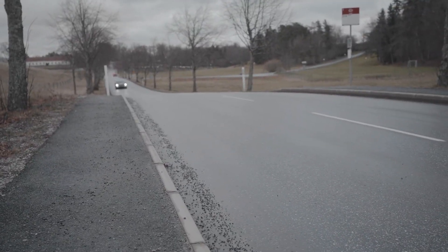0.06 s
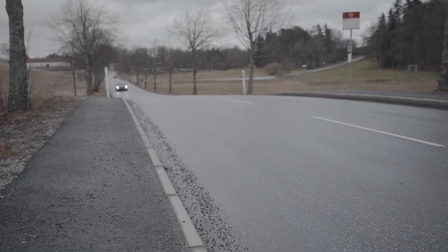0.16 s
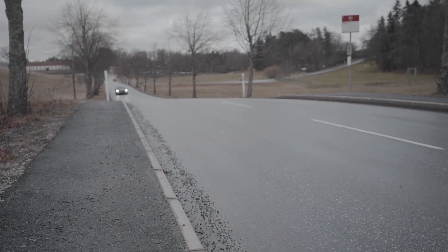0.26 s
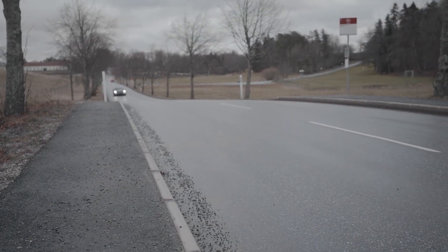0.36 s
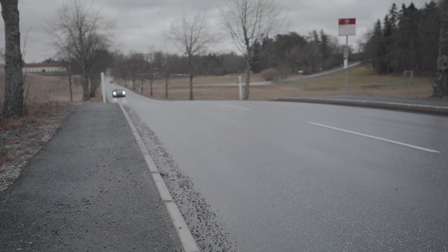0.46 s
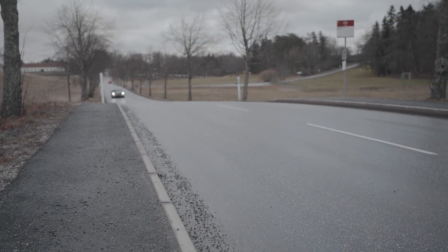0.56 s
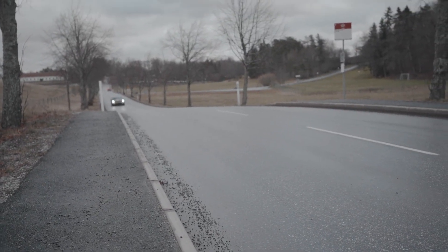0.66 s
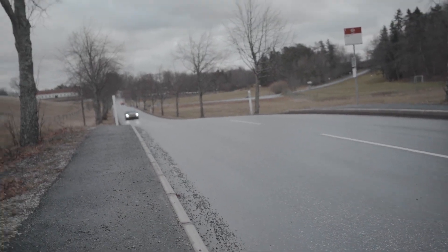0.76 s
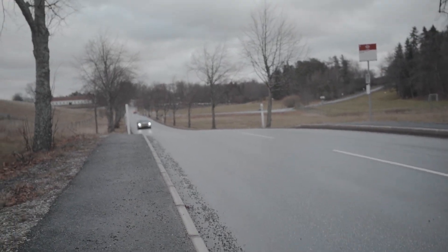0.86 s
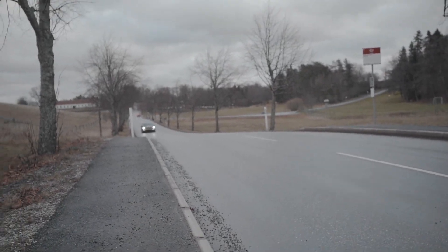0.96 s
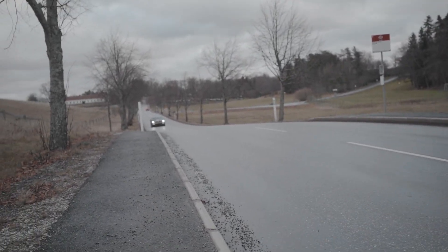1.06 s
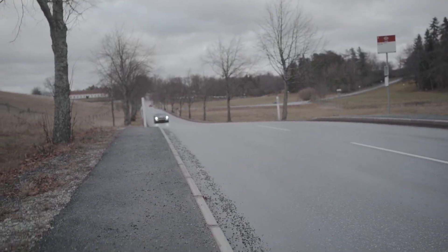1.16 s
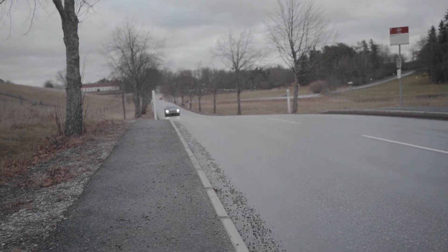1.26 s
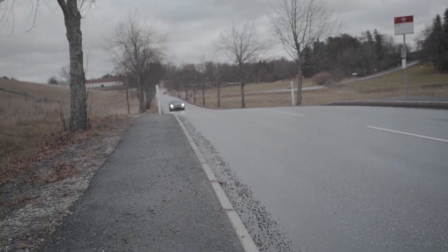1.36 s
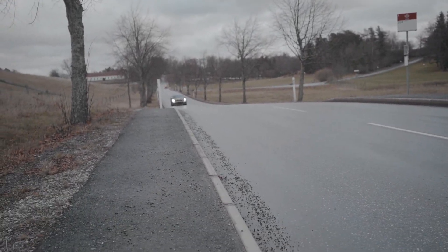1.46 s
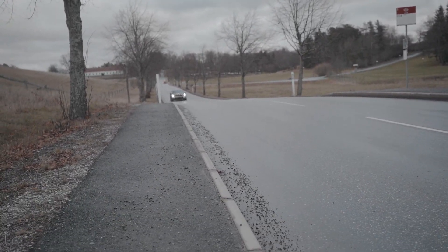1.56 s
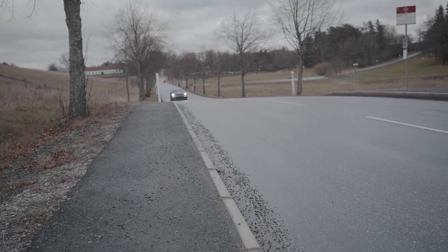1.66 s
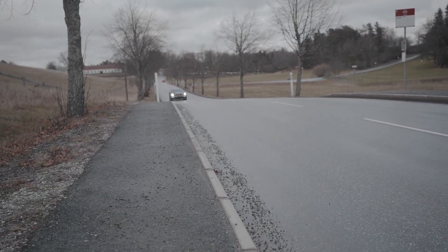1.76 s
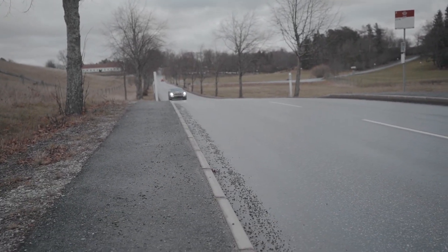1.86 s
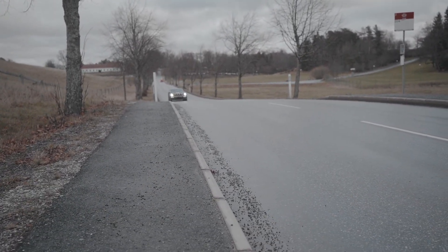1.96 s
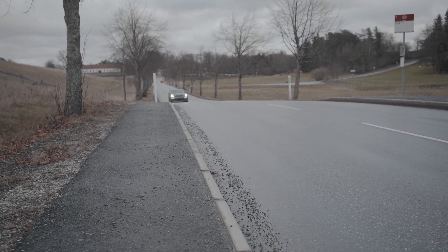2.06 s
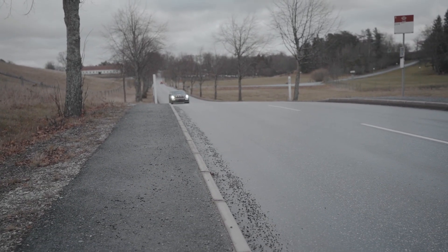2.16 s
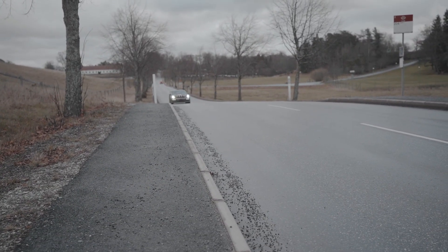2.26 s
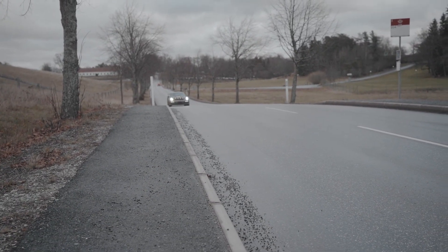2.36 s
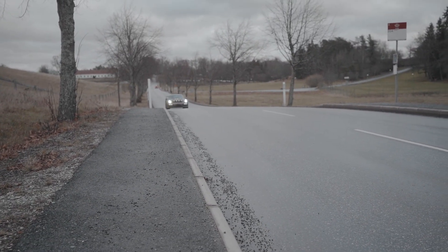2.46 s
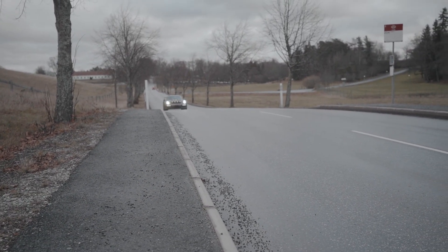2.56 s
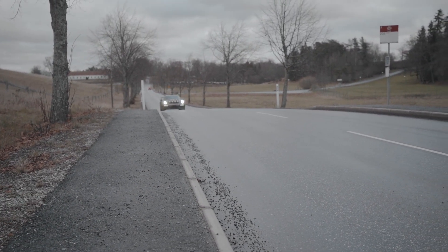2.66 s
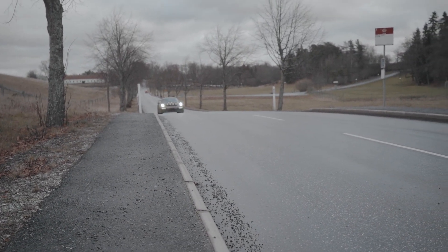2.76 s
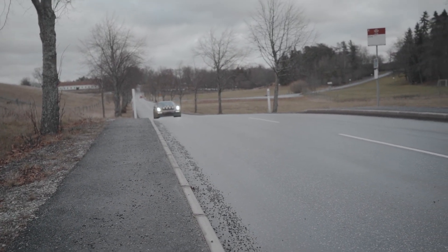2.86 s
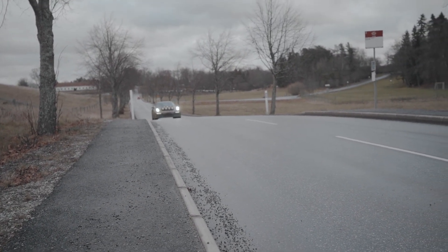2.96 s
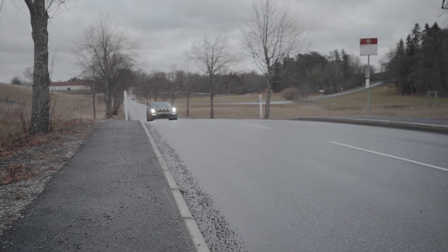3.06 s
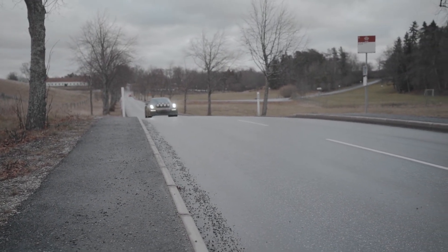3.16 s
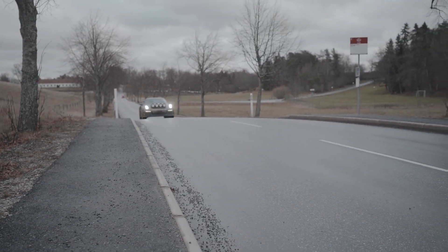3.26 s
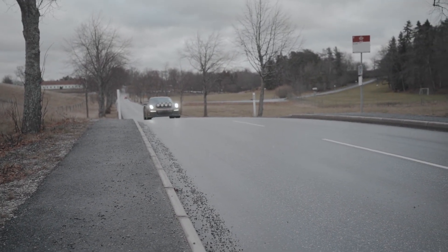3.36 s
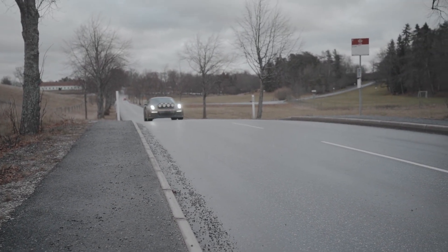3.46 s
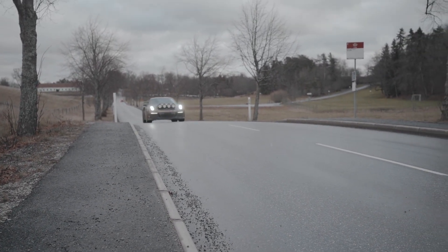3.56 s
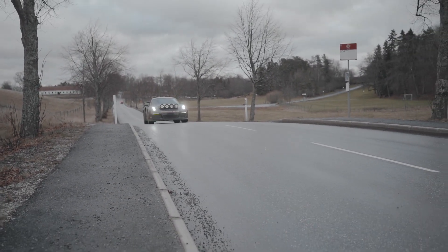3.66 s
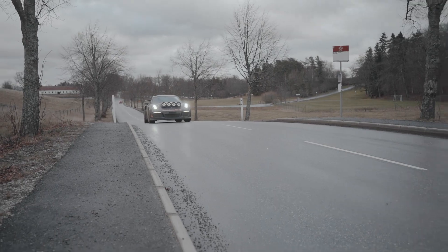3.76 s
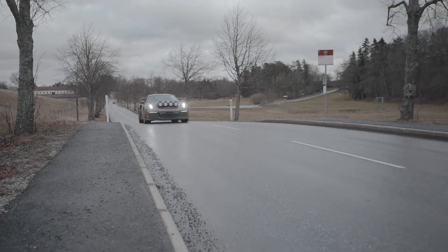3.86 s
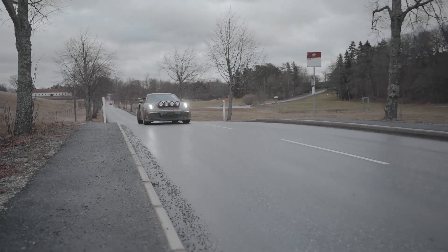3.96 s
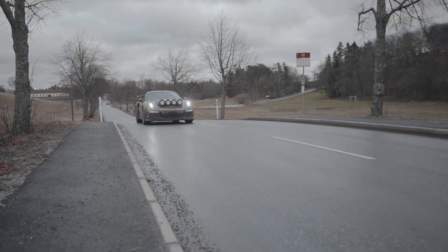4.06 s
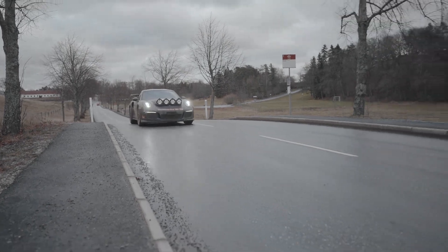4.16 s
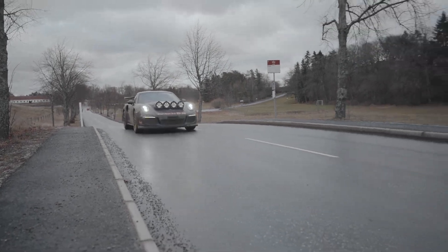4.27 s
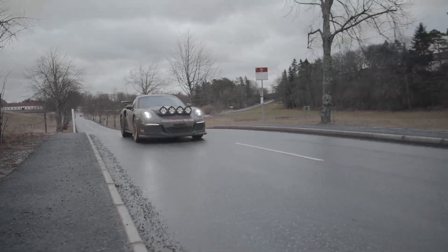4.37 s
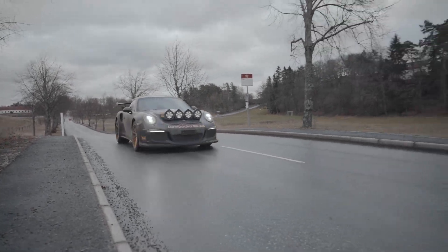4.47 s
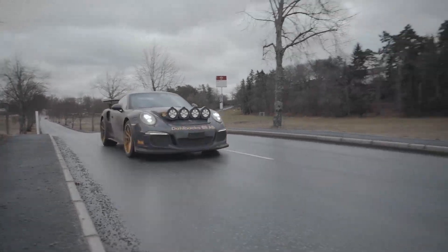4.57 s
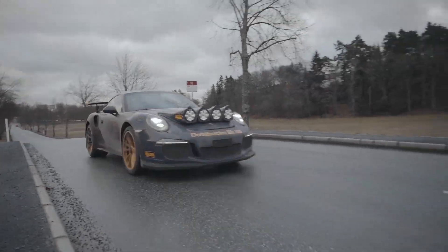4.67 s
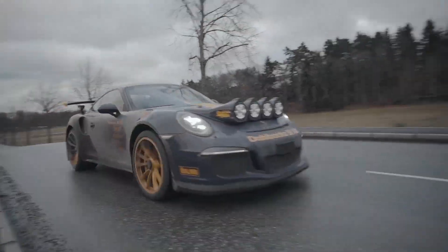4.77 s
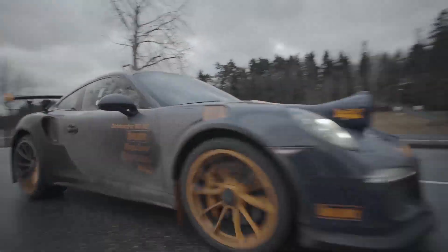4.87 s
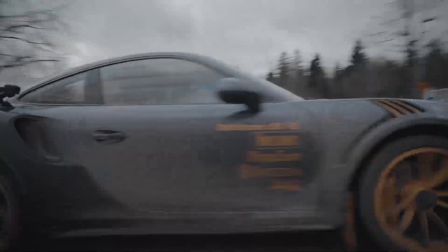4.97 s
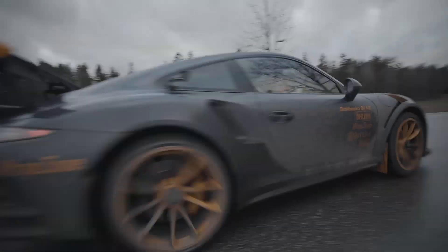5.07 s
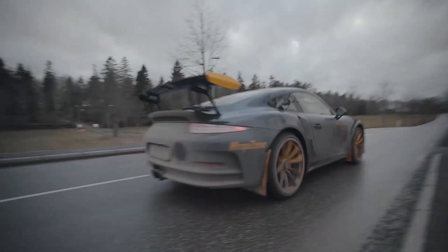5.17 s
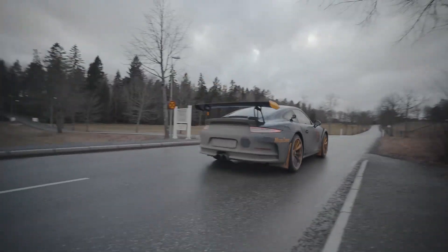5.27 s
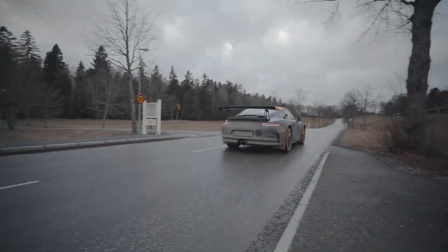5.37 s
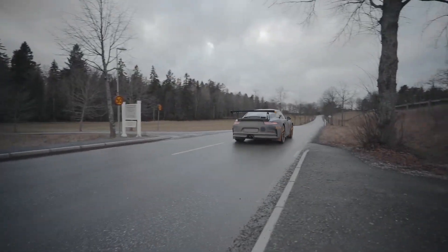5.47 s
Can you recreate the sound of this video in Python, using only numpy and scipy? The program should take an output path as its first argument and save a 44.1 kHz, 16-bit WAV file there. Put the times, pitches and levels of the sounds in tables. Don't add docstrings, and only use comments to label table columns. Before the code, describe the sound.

Gusty wind and a distant engine drone swell into a full-throttle six-cylinder howl, with a crackling gear change and a loud, clipped pass-by.

```python
import sys
import numpy as np
from scipy import signal
from scipy.fft import rfft, irfft
from scipy.io import wavfile
from scipy.ndimage import uniform_filter1d

SR = 44100
rng = np.random.default_rng(int(sys.argv[2]) if len(sys.argv) > 2 else 0)


def transcribe(u):
    v = np.clip(np.atleast_2d(u).T, -1, 1)
    q = np.round(v * 32767).astype(np.int16)
    wavfile.write(sys.argv[1], SR, q)


def linear_from_db(decibels):
    return 10 ** (np.asarray(decibels, float) / 20)


N = 243431
THROTTLE_S = 3.91


def rms_one(x):
    return x / np.sqrt(np.mean(x ** 2) + 1e-20)


def in_time(rows):
    s, *columns = np.transpose(rows)
    return [np.interp(np.arange(N) / SR, s, column) for column in columns]


def step(s, rise_s):
    return 0.5 + 0.5 * np.tanh((np.arange(N) / SR - s) / rise_s)


def bump(s, half_s):
    return np.exp(-0.5 * ((np.arange(N) / SR - s) / half_s) ** 2)


def drift(rate):
    pole = np.exp(-80 * np.pi * rate / SR)
    white = rng.standard_normal(N // 40 + 2002)
    slow = signal.lfilter([1], [1, -2 * pole, pole * pole], white)[2000:]
    return np.interp(np.arange(N) / 40, np.arange(len(slow)), rms_one(slow))


def coloured(spectrum):
    hz, level_db = np.transpose(spectrum)
    bins = np.fft.rfftfreq(N, 1 / SR) + 1e-3
    shape = linear_from_db(np.interp(np.log(bins), np.log(hz), level_db, left=-90, right=-90))
    return rms_one(irfft(rfft(rng.standard_normal(N)) * shape, N))


def band(x, low_hz, high_hz):
    return signal.sosfilt(signal.butter(2, [low_hz, high_hz], "band", fs=SR, output="sos"), x)


def lines(turn, orders, levels_db, wobble_db, rate=5):
    out = 0
    for order, db in zip(orders, levels_db):
        height = np.sqrt(2) * linear_from_db(db + wobble_db * drift(rate))
        phase = rng.uniform(0, 2 * np.pi) + 0.091 * wobble_db * drift(rate)
        out = out + height * np.cos(order * turn + phase)
    return out


# time in seconds, peak in dB, half width in seconds.
GUST_ROWS = [(0.0, -25, .03), (0.15, -23, .07), (0.47, -22, .05), (0.57, -23, .04), (0.67, -26, .05),
             (0.83, -21, .06), (0.95, -24, .07), (1.17, -15, .06), (1.27, -18, .04), (1.39, -17, .06),
             (1.52, -21, .04), (1.66, -16, .09), (1.89, -21, .07), (2.09, -16, .09), (2.25, -18, .09),
             (2.36, -21, .05), (2.46, -21, .04), (2.6, -19, .05), (2.76, -20, .15), (3.0, -24, .06),
             (3.13, -22, .05), (3.3, -21, .12), (3.63, -20, .1), (3.84, -29, .04), (4.16, -31, .06)]
# frequency in Hz, level in dB per Hz.
BUFFET_SPECTRUM = [(5, 8), (9, 12), (16, 6), (26, -4), (40, -11), (60, -17), (120, -27), (200, -42)]


def wind():
    air = coloured(BUFFET_SPECTRUM)
    air = air / np.sqrt(uniform_filter1d(air ** 2, size=5000) + 0.21)
    push = linear_from_db(-33 - 19 * step(3.93, 0.03))
    for s, peak_db, half_s in GUST_ROWS:
        push = push + linear_from_db(peak_db) * bump(s, 0.85 * half_s)
    return push * linear_from_db(6 + 2.2 * drift(6.7)) * air


# time in seconds, peak in dB, 60 dB decay in seconds.
RUSTLE_ROWS = [
    (0.7194, -56, 0.098),
    (1.1114, -58, 0.14),
    (1.1383, -60, 0.12),
    (1.1994, -46, 0.12),
    (1.2794, -56, 0.12),
    (1.3174, -50, 0.12),
    (2.9587, -40, 0.18),
    (3.0214, -44, 0.13),
    (3.3907, -42, 0.086),
]


def rustles():
    envelope, t = np.zeros(N), np.arange(N) / SR
    for s, peak_db, t60 in RUSTLE_ROWS:
        decay_db = -60 * np.abs(t - s) / max(t60, 0.01)
        envelope += step(s + 0.004, 0.005) * linear_from_db(peak_db - 15 + decay_db)
    return envelope * rms_one(band(rng.standard_normal(N), 6500, 15000))


# time in seconds, half width in seconds, harshness in dB, tone change in
# dB.
JOLT_ROWS = [
    (3.91, 0.036, 5, 2.3),
    (4.118, 0.0044, 5.5, -11.5),
    (4.15, 0.014, 5.5, -1.5),
    (4.184, 0.0094, 5, 0),
    (4.59, 0.044, 4.5, -1.5),
    (4.615, 0.0075, 7.5, -15),
]


def jolts():
    out = 0
    for s, half_s, harsh_db, tone_db in JOLT_ROWS:
        out = out + bump(s, half_s) * np.array([[harsh_db], [tone_db]])
    return out


# time in seconds, level in dB, brightness in dB per octave.
ROAD_COURSE = [(0.03, 0, -3), (0.35, 0.5, -1), (0.9, -2, 1.3), (1.5, -3.5, 0.3), (2.1, -2.5, 0.9),
               (2.7, -1, 0), (3.66, 9.5, -1), (3.8, 10, 1.1), (4.0, 6.5, 0.16), (4.42, 5, 1.05),
               (4.56, 6.5, 0.84), (4.8, 13, 0.3)]
# frequency in Hz, level in dB per Hz.
ROAR_SPECTRUM = [(350, -19.5), (600, -5.5), (740, -2.5), (1000, -1), (1300, -2.5), (1650, -5),
                 (2000, -10.5), (3000, -15.5), (3600, -18.5), (4000, -21), (6000, -31), (8500, -32),
                 (9500, -40.5), (15500, -54)]


def road(turn):
    (level_db, tilt_db), harsh_db = in_time(ROAD_COURSE), jolts()[0]
    tilt_db = tilt_db + 0.03 * harsh_db
    noise, shared = [coloured(ROAR_SPECTRUM), coloured(ROAR_SPECTRUM)], drift(7)
    edges_hz = 500 * 2 ** np.arange(0, 5.1, 1 / 3)
    out = 0
    for k, (low, high) in enumerate(zip(edges_hz, edges_hz[1:])):
        gain_db = level_db + tilt_db * np.log2(np.sqrt(low * high) / 1300)
        out = out + band(noise[k % 2], low, high) * linear_from_db(gain_db + 0.59 * shared + 0.67 * drift(43))
    return linear_from_db(-39.5 + harsh_db + 0.53 * np.cos(turn) + 0.32 * drift(150)) * out


# multiple of the firing rate, level in dB.
GEAR_LINES = [(21, -68), (21.5, -70), (23.5, -70), (23.8, -70)]


def whine(turn):
    audible = step(0.35, 0.1) - step(THROTTLE_S, 0.04)
    level = linear_from_db(0.6 * in_time(ROAD_COURSE)[0] + 0.5)
    return lines(turn, *np.transpose(GEAR_LINES), wobble_db=2.5, rate=20) * level * audible


# time in seconds, crack in dB, thud in dB.
POPS = [
    (4.112, -10, -16),
    (4.1267, -10.5, 1.5),
    (4.1352, -20, -1.5),
    (4.1548, -18, -1),
    (4.163, -23, -27),
    (4.1784, -6, -7),
    (4.1878, -30, -3),
]


def misfires():
    s, crack_db, thud_db = np.transpose(POPS)
    out, at = np.zeros(N), (s * SR).astype(int)
    modes = [(1520, 0.024, crack_db - 7), (547, 0.019, thud_db - 9.5), (110, 0.033, thud_db - 9.5)]
    for hz, t60, level_db in modes:
        clicks = np.full(N, 1e-18)
        clicks[at] = -linear_from_db(level_db)
        r, w = linear_from_db(-60 / (t60 * SR)), 2 * np.pi * hz / SR
        out += signal.lfilter([0, np.sin(w)], [1, -2 * r * np.cos(w), r * r], clicks)
    return signal.lfilter(*signal.butter(1, 2500, fs=SR), out)


# time in seconds, rasp and churn in dB against the firing tone.
TAIL_COURSE = [(4.6, -56, -46.5), (4.86, -18.5, -35.5), (5.04, -30, -13.5), (5.17, -15, -15.5),
               (5.25, -7, -19), (5.33, -7, -12), (5.41, -10, -17), (5.49, -17.5, -17)]
LOPE_LEVELS = [-3.5, 1, -1.5, -5, -4]
LIFT_CHANGES = [12.5, -3.5, 11.5, 4.5, -1.5]
# frequency in Hz, level in dB per Hz.
WAKE_SPECTRUM = [(10, -0.5), (30, -9.5), (90, -11), (250, -13), (700, -8), (1500, -38)]
# frequency in Hz, level in dB per Hz.
RASP_SPECTRUM = [(60, -11), (300, -19.5), (800, 8), (2000, 11.5), (4000, -2), (8000, -15), (15000, -39)]
# time in seconds, share of the firing tone's height.
BOW_WAVE = [(4.75, 0), (5.01, .3), (5.05, .1), (5.135, .62), (5.185, -.33), (5.26, -.2), (5.31, .22),
            (5.44, -.08), (5.5, .2)]


def tailpipe(turn):
    rasp_db, churn_db = in_time(TAIL_COURSE)
    lifted = step(5.43, 0.026)
    lope_db = [churn_db + db + lift_db * lifted for db, lift_db in zip(LOPE_LEVELS, LIFT_CHANGES)]
    lope = lines(turn, [1 / 3, 1 / 2, 2 / 3, 4 / 3, 3 / 2], lope_db, wobble_db=2.5, rate=28)
    churn = linear_from_db(churn_db + 1.5) * coloured(WAKE_SPECTRUM)
    puffs = linear_from_db(3 * np.cos(turn - 0.8) + 1.0 * drift(60))
    rasp = linear_from_db(rasp_db) * rms_one(puffs * coloured(RASP_SPECTRUM))
    return lope + churn + rasp + np.sqrt(2) * in_time(BOW_WAVE)[0]


# time in seconds, firing tone in dB, pulse edge in dB against
# the tone, uneven growl in dB.
ENGINE_COURSE = [(0.1, -40, -2.5, -49.5), (0.7, -37.5, -7, -48), (1.99, -31, -9, -45),
                 (2.85, -24.5, -8, -37), (3.7, -21.5, -4, -35), (3.78, -18, -7, -32),
                 (3.87, -14.5, -7.5, -34.5), (4.06, -12.5, -16, -38), (4.3, -11.5, -13.5, -40),
                 (4.42, -11.5, -16, -38.5), (4.58, -12, -8.5, -40), (4.65, -15, -5, -40),
                 (4.77, -12, -10, -36.5), (4.98, 0.5, -8, -20.5), (5.05, 5.5, -16.5, -38),
                 (5.17, 6, -7, -31.5), (5.36, 7.5, -13.5, -28.5), (5.48, 11, -3.5, -29)]
# time in seconds, gain of the upper multiples in dB.
BITE_COURSE = [(3.76, -5), (3.86, 4), (4.04, 4), (4.1, -5)]
BANK_LEVELS = [-11, 2, -6.5, -11, -25]
CYLINDER_LEVELS = [-13, -29.5, -4.5, 0.5, -6.5, -6.5, -13, -16]
SIXTH_LEVELS = [4, -13.5, -26, -5, -36.5, -9.5, -11, -31]
UPPER_LEVELS = [-10, -14, -12, -15, -19]
# frequency in Hz, level in dB per Hz.
RUMBLE_SPECTRUM = [(40, -35), (90, -5.5), (220, 18), (400, -8), (600, -1), (900, -28.5)]


def exhaust(turn):
    (tone_db, edge_db, growl_db), (harsh_db, choke_db) = in_time(ENGINE_COURSE), jolts()
    tone, cylinder = linear_from_db(tone_db + choke_db), linear_from_db(growl_db + harsh_db)

    late_harsh_db = np.roll(harsh_db, int(0.021 * SR))
    second = linear_from_db(tone_db + edge_db + 0.64 * late_harsh_db + 0.72 * drift(15))
    slip = 1.87 * (step(4.616, 0.005) - step(4.88, 0.061))
    first_line = tone * linear_from_db(0.65 * drift(6)) * np.cos(turn)
    second_line = second * np.cos(2 * turn + 2.12 + slip + 0.76 * drift(2.24))
    firing = np.sqrt(2) * (first_line + second_line)

    shift = step(4.095, 0.013) - step(4.188, 0.008)
    third = cylinder * linear_from_db(-2.5 + 9 * shift)
    third = third + linear_from_db(tone_db + 2 * edge_db - 6.5 + 6 * step(5.7, 0.04))
    square = np.sqrt(2) * linear_from_db(2.7 * drift(5)) * np.cos(3 * turn + 3.4 + 0.22 * drift(8.2))
    bite = linear_from_db(in_time(BITE_COURSE)[0])
    upper = square + bite * lines(turn, range(4, 9), UPPER_LEVELS, wobble_db=3.0)

    bank_db = 0.24 - 11 * step(THROTTLE_S, 0.057) + 14 * shift
    bank = cylinder * linear_from_db(bank_db + 4.24 * drift(8.9))
    halves = lines(turn, np.arange(5) + 0.5, BANK_LEVELS, wobble_db=0.0)
    thirds = lines(turn, [k / 3 for k in range(12) if k % 3], CYLINDER_LEVELS, wobble_db=2.1)
    sixths = lines(turn, [k / 6 for k in range(1, 24, 2) if k % 3], SIXTH_LEVELS, wobble_db=3.1)
    sixths = linear_from_db(-15 * step(THROTTLE_S, 0.04)) * sixths
    rumble = linear_from_db(2.5 + 1.52 * drift(21)) * coloured(RUMBLE_SPECTRUM)
    growl = bank * halves + cylinder * (thirds + sixths + rumble)
    return firing + third * upper + growl + tone * tailpipe(turn)


# time in seconds, firings per second.
FIRING_RATE = [(0.15, 154.5), (1.2, 152.0), (2.85, 153.7), (3.77, 153.0), (3.81, 157.1), (3.92, 185.5),
               (4.07, 218.5), (4.17, 204.8), (4.25, 224.8), (4.3, 226.0), (4.41, 221.0), (4.57, 231.1),
               (4.66, 241.5), (4.9, 258.5), (4.99, 275.6), (5.1, 271.6), (5.38, 273.0), (5.44, 279.5)]


def scene():
    turn = 2 * np.pi * np.cumsum(in_time(FIRING_RATE)[0]) / SR
    return (wind() + rustles() + road(turn) + whine(turn) + misfires() + exhaust(turn))[None]


def roll_off(x):
    return signal.sosfilt(signal.butter(12, 15760, fs=SR, output="sos"), x)


# time in seconds, level in dB.
CEILING_COURSE = [(4.0, 3), (4.45, 8), (4.72, -7), (4.86, -10), (5.05, -11), (5.52, -11)]
# frequency in Hz, level in dB per Hz.
RAIL_SPECTRUM = [(100, 4), (400, -6), (1500, -30), (5000, -26), (15000, -25)]


def record(dry):
    top = linear_from_db(in_time(CEILING_COURSE)[0]) * (1 + 0.04 * coloured(RAIL_SPECTRUM))
    knee = 12
    passed = dry / (1 + np.abs(dry / top) ** knee) ** (1 / knee)
    passed = passed * np.minimum(np.arange(N) / SR / 0.004, 1)
    tilted = signal.lfilter(*signal.butter(1, 35, "high", fs=SR), passed)
    mix = signal.sosfiltfilt(signal.cheby2(10, 30, 16150, fs=SR, output="sos"), tilted)
    return roll_off(mix)


dry = scene()
out = record(dry)
transcribe(out)
```